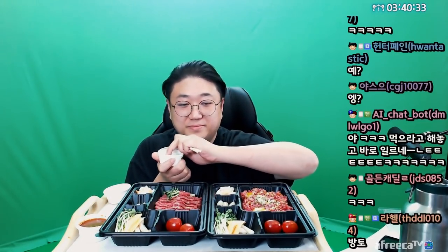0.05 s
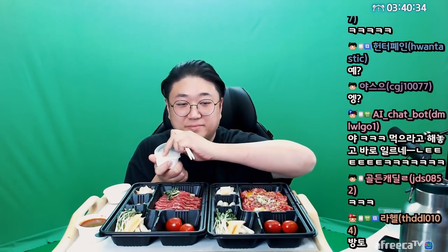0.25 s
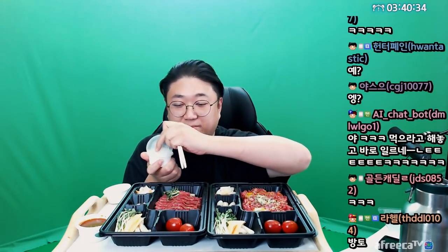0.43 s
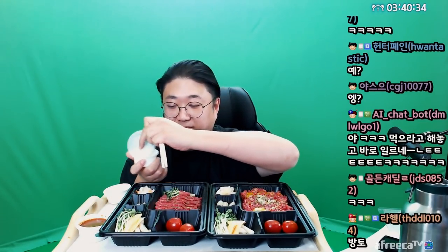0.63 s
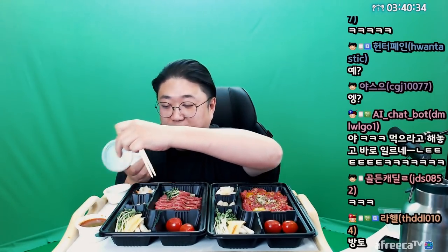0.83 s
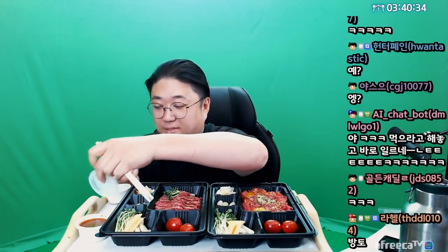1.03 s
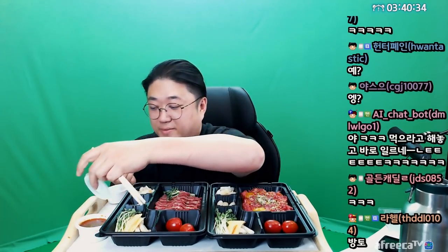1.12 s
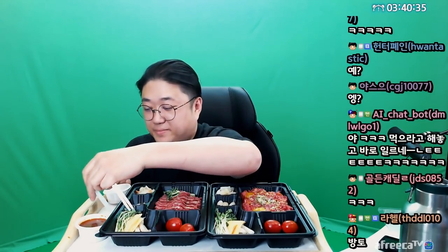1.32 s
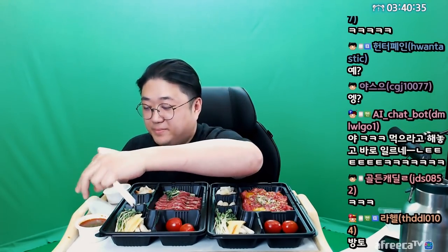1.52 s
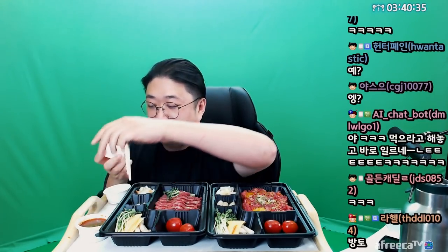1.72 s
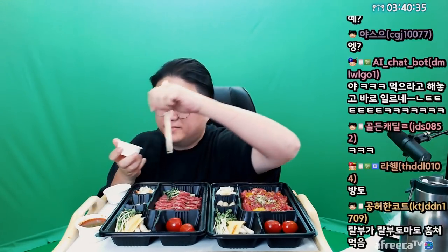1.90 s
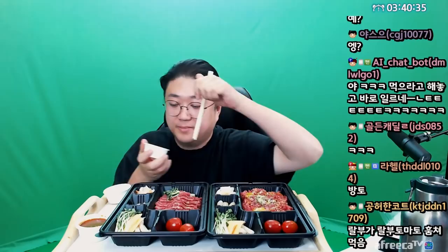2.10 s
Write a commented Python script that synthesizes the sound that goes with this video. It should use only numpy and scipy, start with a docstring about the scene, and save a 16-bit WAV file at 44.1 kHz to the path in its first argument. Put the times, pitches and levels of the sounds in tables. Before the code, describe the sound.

Chopsticks tap and scrape inside a small cup, with a loud cluster of sharp clicks early on. After a lull of soft rubbing, they knock the cup again and clack together, close to the microphone in a small room.

```python
"""Chopsticks tap and scrape inside a small cup, close to a microphone in a small, faintly noisy room.
Each tap is a bright crack plus the short hollow ring of the cup; each scrape is a run of tiny slips.
After a lull with soft rubbing and a thin squeak, the cup is knocked again and the two chopsticks
clack together. The hardest taps overload the microphone."""
import sys
import numpy as np
from scipy import signal
from scipy.fft import rfft, irfft
from scipy.io import wavfile
from scipy.ndimage import uniform_filter1d

SR = 44100
rng = np.random.default_rng(int(sys.argv[2]) if len(sys.argv) > 2 else 0)


def store_pcm(level_fs):
    """Save levels as 16-bit WAV."""
    pcm = np.round(np.clip(level_fs, -1, 1) * 32767).astype(np.int16)
    wavfile.write(sys.argv[1], SR, np.atleast_2d(pcm).T)


N = 94815


def amp(db):
    """Turns decibels (dB) into a factor to multiply a sound by."""
    return 10 ** (np.asarray(db) / 20)


def unit(x):
    """Scales a sound to an average (rms) level of 1."""
    return x / np.sqrt(np.mean(x ** 2) + 1e-20)


def fade(t, t60):
    """Dies away by 60 dB every t60 seconds, the fade time."""
    return np.exp(-np.log(1000) * t / t60)


def read(points, hz):
    """Reads between the rows of a table, on a log-frequency scale."""
    row_hz, value = np.transpose(points)
    return np.interp(np.log(hz + 1), np.log(row_hz + 1), value)


def add(mix, start_s, sound):
    """Mixes a sound in at its start time."""
    part = mix[max(round(start_s * SR), 0):][:len(sound)]
    part += sound[:len(part)]


def colour(x, tone, tilt_db=0, size=2048):
    """Filters a sound to follow a tone table; a positive tilt brightens the treble."""
    hz = abs(np.fft.fftfreq(size, 1 / SR))
    octaves = np.log2(np.maximum(hz, 8000 / 6) / 8000)  # the tilt pivots at 8000 Hz
    log_gain = np.log(amp(read(tone, hz) + tilt_db * octaves))
    spectrum = np.exp(np.conj(signal.hilbert(log_gain)))  # so nothing sounds ahead of a hit
    response = np.fft.ifft(spectrum).real[:size // 2]
    return signal.fftconvolve(x, response / np.linalg.norm(response))[:len(x)]


def room_noise(level_db=-54):
    """Steady low room noise with a little microphone hiss."""
    # Each row: frequency in Hz, level in dB.
    tone = [(20, -40), (45, -5), (68, -1.5), (100, 0), (140, 1), (230, 0.5), (320, -10.5), (480, -5),
            (800, -14.5), (1500, -17), (2300, -26), (4500, -28), (8000, -21), (11000, -26), (16000, -32.5)]
    gain = amp(read(tone, np.fft.rfftfreq(N, 1 / SR)))
    return amp(level_db) * unit(irfft(rfft(rng.standard_normal(N)) * gain, N))


def crack(tone, t60, tilt_db=0, rise_s=0.0001, hold_s=0.00055, size=4096):
    """A hard hit starts many high vibrations that die at once: a tiny burst of noise."""
    t = np.arange(size) / SR
    shape = (1 - np.exp(-t / rise_s)) * fade(np.maximum(t - hold_s, 0), t60)
    burst = rng.choice([-1., 1.], size) * shape
    return unit(colour(burst, tone, tilt_db)) * np.std(shape)


def ring(hz, t60, swell_cycles=0.95, size=4096):
    """One natural note of a struck object: it swells quickly, then dies away."""
    t = np.arange(size) / SR
    swell = 1 - np.exp(-hz * t / swell_cycles)
    return swell * fade(t, t60) * np.sin(2 * np.pi * hz * t)


def dry_ring(hz, spread_hz, t60, size=4096):
    """Many close notes die together: a dry clack with the energy of a single ring."""
    band = np.exp(-.5 * ((np.fft.rfftfreq(size, 1 / SR) - hz) / spread_hz) ** 2)
    notes = irfft(band * np.exp(2j * np.pi * rng.random(len(band))))
    bass_cut = signal.butter(2, min(hz / SR, .5), "high")
    sound = signal.lfilter(*bass_cut, notes * fade(np.arange(size) / SR, t60))
    return unit(sound) * np.std(ring(hz, t60, size=size))


def cup(hollow_db, rim_db, wall_db):
    """The cup rings; where it is struck decides how much each part sounds."""
    # The cup's natural notes. Each row: pitch in Hz, level in dB, fade time in seconds.
    notes = [(433, 2, 0.033), (530, -8.5, 0.013), (730, -3.5, .022), (797, -14, 0.015), (941, 1.5, 0.02),
             (1364, -8, 0.032), (1527, 1.5, 0.023), (1674, -10.5, .024)]
    # The part each note belongs to: 0 is the hollow, 1 the rim, 2 the wall.
    parts = [0, 0, 0, 1, 1, 2, 2, 2]
    part_db = [hollow_db, rim_db, wall_db]
    return sum(amp(db + part_db[part]) * ring(hz, t60) for (hz, db, t60), part in zip(notes, parts))


def taps(cup_lag_s=0.00088):
    """Chopstick tips strike the cup: a crack, the dry ring of tip and shaft, then the cup's body."""
    # Each row: start in seconds, crack level in dB, crack tilt in dB per octave, tip pitch in Hz and
    # level in dB, shaft pitch in Hz and level in dB, then the cup's hollow, rim and wall levels in dB.
    hits = [(.0005, -36, -7, 7960, -54, 3300, -51, -43, -28.5, -44),
            (0.0116, -34.5, -7, 7900, -52, 3330, -54, -47, -44, -40.5),
            (0.0244, -39.5, -10, 8200, -38, 3300, -52, -59, -58, -60),
            (.0380, -24.5, 1.5, 8100, -40, 4800, -47, -72, -30, -58),
            (.0400, -22.5, -0.5, 8150, -22.5, 4900, -28, -25.5, -19, -56),
            (0.13, -30, -3.5, 7700, -47, 3300, -33, -50, -32.5, -43),
            (0.148, -40, -0.5, 7600, -44, 3350, -39, -42, -64, -41),
            (0.1568, -39, -7, 8000, -52, 3260, -44, -49, -59, -45),
            (0.1655, -40, -7, 8000, -58, 3300, -55, -43, -63, -49),
            (0.2087, -38, -8, 8000, -53, 3320, -64, -59, -45.5, -46.5),
            (0.239, -2, 0.5, 9400, -18, 5760, -11, -36, -18, -21.5),
            (0.2591, -6.5, 4, 7840, -8.5, 3640, -20.5, -40, -40, -30),
            (0.2635, -3, 4.5, 6450, -9.5, 3430, -11.5, -55, -23.5, -26.5),
            (0.2811, -3.5, -2, 8250, -5, 3550, -18, -26.5, -15, -17),
            (0.303, -16.5, 0.5, 6500, -16.5, 3450, -42, -29, -61.5, -17),
            (0.589, -50, -2, 9000, -56, 2020, -40, -63, -32.5, -46.5),
            (0.6076, -31.5, -5.5, 9000, -41, 2050, -37, -65, -36, -35),
            (.6198, -14, -2.5, 9040, -16, 3170, -41, -32.5, -17, -28),
            (.6914, -20.5, 3, 6870, -21, 3920, -29, -38, -31.5, -48),
            (.8940, -45.5, 10, 9820, -26, 6600, -38.5, -72, -56, -74),
            (0.927, -48, -1, 11400, -41.5, 3790, -45, -65, -72, -75),
            (1.1629, -32.5, 7, 9000, -31.5, 4470, -57.5, -70, -63.5, -66.5),
            (1.5745, -25.5, -3.5, 12200, -23.5, 2700, -32, -27, -31.5, -44),
            (1.6070, -27.5, 2, 12800, -32, 2770, -39, -36, -38, -43),
            (1.6237, -39, 14, 10300, -38, 2800, -68, -47, -39, -64),
            (1.7244, -25, 5.5, 11500, -26, 3200, -35.5, -54, -58, -49),
            (1.7296, -32, 7, 8900, -24.5, 3100, -48, -45, -58, -62)]
    # Each row: frequency in Hz, level in dB.
    crack_tone = [(60, -52), (250, -30.5), (620, -17.5), (800, 2), (1180, -26), (1600, -8.5), (2700, -9.5),
                  (3400, -5), (4800, -8.5), (6600, 0), (8300, 2), (10500, -1.5), (13000, -7.5),
                  (16000, -9.5)]
    out = np.zeros(N)
    for start, crack_db, tilt_db, tip_hz, tip_db, shaft_hz, shaft_db, *cup_db in hits:
        contact = amp(crack_db) * crack(crack_tone, t60=0.0092, tilt_db=tilt_db)
        tip = amp(tip_db) * dry_ring(tip_hz, spread_hz=750, t60=0.018)
        shaft = amp(shaft_db) * dry_ring(shaft_hz, spread_hz=287, t60=0.021)
        add(out, start, contact + tip + shaft)
        add(out, start + cup_lag_s, cup(*cup_db))
    return out


def rubs(slips_per_s=3800, spread_db=3.5):
    """Chopsticks slide in tiny slips that hiss, grate and set the cup ringing."""
    # Each row: start and length in seconds, then the hiss, grit and cup levels in dB.
    strokes = [(0, 0.12, -60.5, -52, -49.5), (0.161, 0.17, -58.5, -53, -44.5),
               (0.502, 0.1, -62.5, -62, -53), (0.726, 0.052, -46, -77, -70),
               (1.061, 0.05, -50.5, -65, -65.5), (1.103, .11, -49.5, -71, -75),
               (1.297, 0.15, -58.5, -68.5, -72), (1.464, 0.097, -57, -76, -69)]
    # Each row of both tables: frequency in Hz, level in dB.
    hiss_tone = [(500, -18), (2500, -24), (5000, -11.5), (7500, -1), (9000, 3), (11500, -6), (16000, -14.5)]
    grit_tone = [(300, -24), (1200, -5.5), (2200, -0.5), (2800, -4), (3500, -2.5), (5000, -4), (8000, -5.5),
                 (16000, -15.5)]
    sizes = rng.choice([-1, 1], N) * amp(spread_db * np.minimum(rng.exponential(1, N), 4))
    slips = (rng.random(N) < slips_per_s / SR) * sizes
    hiss, grit = unit(colour(slips, hiss_tone)), unit(colour(slips, grit_tone))
    body = unit(signal.fftconvolve(slips, cup(hollow_db=-14, rim_db=0, wall_db=-3))[:N])
    out = np.zeros(N)
    for start, length, hiss_db, grit_db, body_db in strokes:
        swell = np.sin(np.pi * np.clip((np.arange(N) / SR - start) / length, 0, 1))
        out += swell * (amp(hiss_db) * hiss + amp(grit_db) * grit + amp(body_db) * body)
    return out


def squeak(waver_hz=35):
    """A very faint, thin tone that glides and wavers a little."""
    # Each row: time in seconds, pitch in Hz, level in dB.
    glide = [(.5, 12600, -91), (.565, 12600, -71), (.6, 13200, -70), (.65, 13000, -72), (.78, 12800, -66),
             (.81, 12600, -64), (.855, 12650, -62), (.885, 12300, -68), (.92, 11900, -87)]
    times, hz, db = np.transpose(glide)
    t = np.arange(N) / SR
    waver = unit(uniform_filter1d(rng.standard_normal(N), size=200))
    pitch = np.interp(t, times, hz) + waver_hz * waver
    level = np.interp(t, times, amp(db), left=0, right=0)
    return level * np.sin(2 * np.pi * np.cumsum(pitch) / SR)


def clacks(spread_hz=210):
    """The chopsticks knock together at the cup's rim; the grip shifts their pitch."""
    # Each row: start in seconds, crack and ring levels in dB, lowest pitch in Hz,
    # then the cup's hollow and rim levels in dB.
    hits = [(1.6420, -18.5, -17.5, 1880, -39.5, -64), (1.6714, -30, -33, 1900, -35.5, -67),
            (1.7611, -38, -44, 1770, -46, -62), (1.7806, -39.5, -46, 1980, -42, -40),
            (1.8024, -37, -57, 2050, -57, -63), (1.8075, -20.5, -23, 2000, -65, -41),
            (1.8141, -20.5, -15, 2037, -53, -29), (1.8215, -22.5, -23, 1900, -49, -42),
            (1.8675, -28.5, -32.5, 1900, -53, -40), (1.8797, -23, -29, 2106, -56, -37),
            (1.8941, -40.5, -41, 1980, -66, -37.5)]
    # A bending chopstick's notes. Each row: multiple of lowest pitch, level in dB, fade time in seconds.
    notes = [(1, -17.5, 0.015), (2.15, 2, 0.015), (3.46, -2, 0.011), (4.1, -13, 0.014), (4.92, -9.5, 0.017)]
    # Each row: frequency in Hz, level in dB.
    crack_tone = [(60, -30), (400, -18.5), (620, -15.5), (850, -2), (1130, -12.5), (1650, 3), (2400, -1),
                  (3000, -5), (4300, -6), (5200, -4), (8300, 1.5), (12000, -6), (16000, -10.5)]
    out = np.zeros(N)
    for start, crack_db, ring_db, hz, hollow_db, rim_db in hits:
        bending = sum(amp(db) * dry_ring(hz * ratio, spread_hz, t60) for ratio, db, t60 in notes)
        contact = amp(crack_db) * crack(crack_tone, t60=0.024)
        body = cup(hollow_db, rim_db, wall_db=rim_db - 5)
        add(out, start, contact + amp(ring_db) * bending + body)
    return out


def room(x, tail_db=-12, build_s=0.0035):
    """Sound bounces off the table and walls: a few quick echoes and a short, blurred tail."""
    # Each row: delay in seconds, level in dB.
    echoes = [(.0052, -17.5), (.0092, -21.5), (0.0176, -20)]
    # Each row: frequency in Hz, level in dB.
    tail_tone = [(100, 14.5), (500, 4), (1500, 4), (4000, -2), (7000, 1.5), (10000, -5), (16000, -8.5)]
    # Each row: frequency in Hz, fade time in seconds.
    fade_times = [(100, .2), (400, 0.073), (900, 0.24), (1600, 0.32), (3500, 0.35), (7500, 0.28),
                  (11000, 0.33), (16000, 0.45)]
    hz, t, bands = signal.stft(rng.standard_normal(SR), SR, nperseg=256)
    bands = bands * amp(read(tail_tone, hz))[:, None] * fade(t, read(fade_times, hz)[:, None])
    tail = signal.istft(bands, SR, nperseg=256)[1][:SR]
    tail *= 1 - np.exp(-np.arange(SR) / SR / build_s)
    response = amp(tail_db) * tail / np.linalg.norm(tail)
    for delay, db in echoes:
        add(response, delay, np.array([amp(db)]))
    return x + signal.fftconvolve(x, response)[:N]


def scene():
    """All the chopstick sounds in the room, over its steady noise."""
    return (room(taps() + clacks() + rubs() + squeak()) + room_noise())[None]


def record(dry, bass_hz=45, top_hz=15800):
    """The microphone overloads on the hardest taps and loses the deepest bass and highest treble."""
    overloaded = np.clip(dry, -1, 1)
    bass_cut = signal.butter(2, bass_hz, "high", fs=SR)
    treble_cut = signal.firwin(255, top_hz, window=("kaiser", 10), fs=SR)
    return signal.oaconvolve(signal.lfilter(*bass_cut, overloaded), treble_cut[None], "same")


dry = scene()
out = record(dry)
store_pcm(out)
```